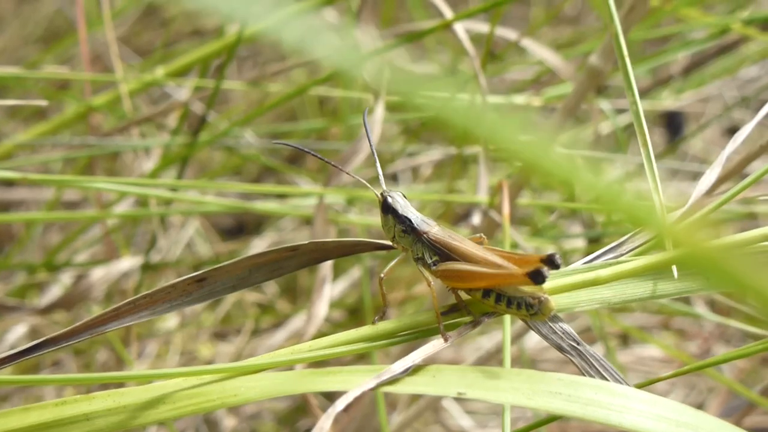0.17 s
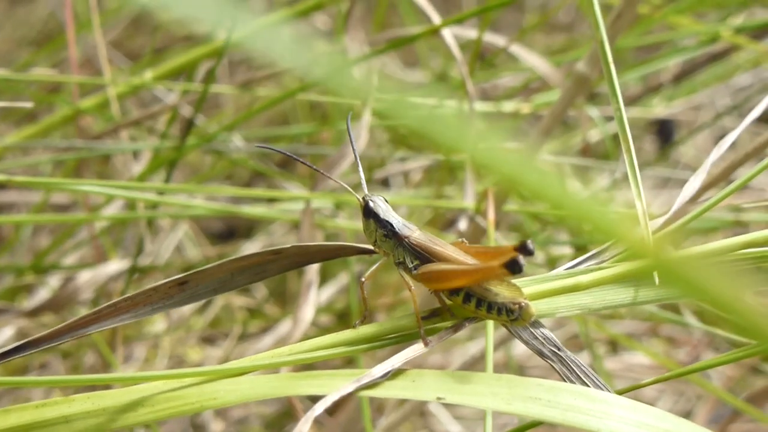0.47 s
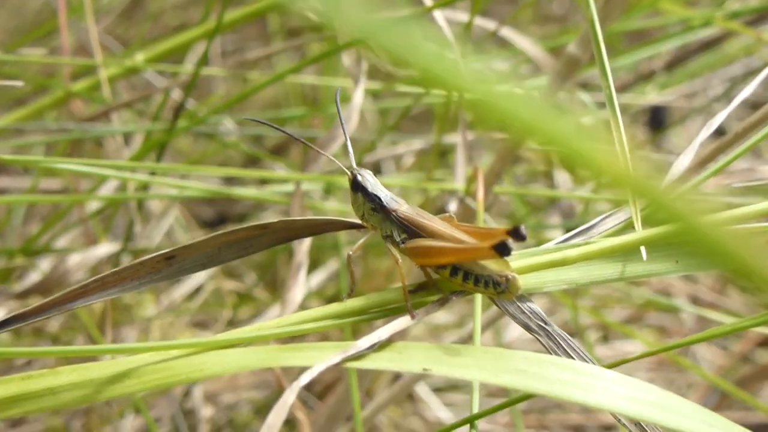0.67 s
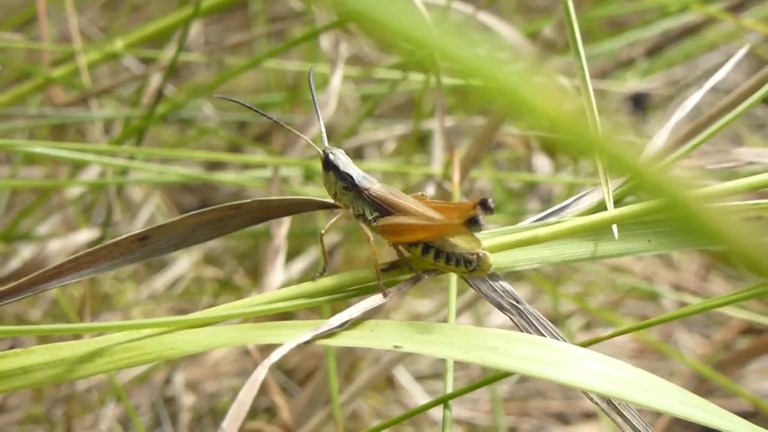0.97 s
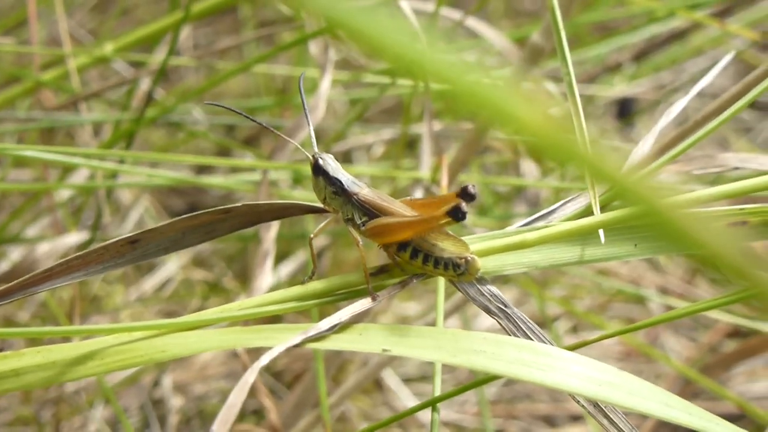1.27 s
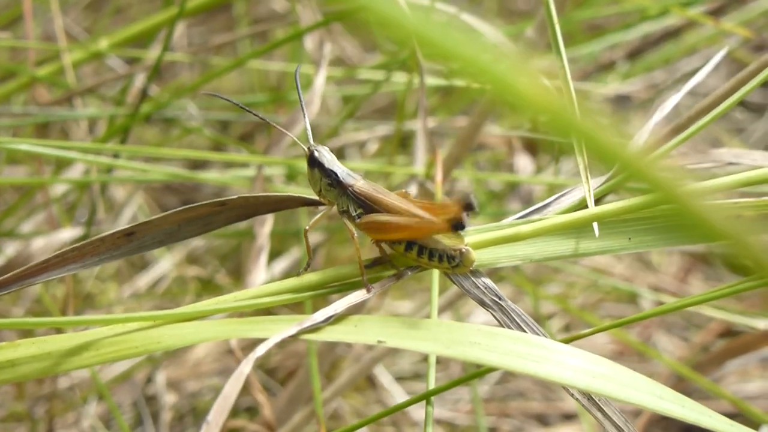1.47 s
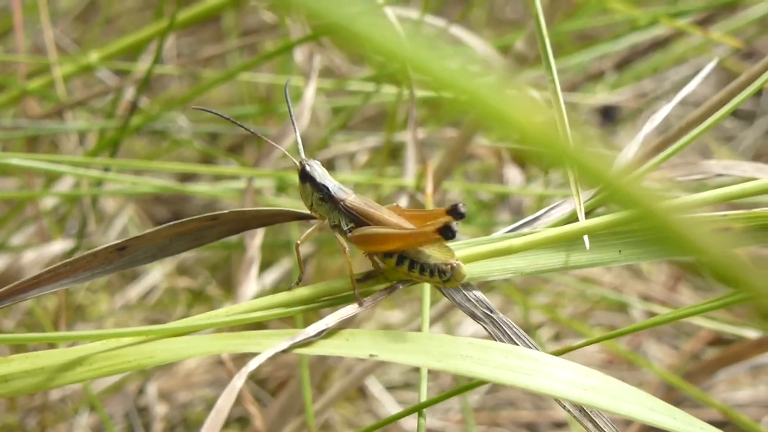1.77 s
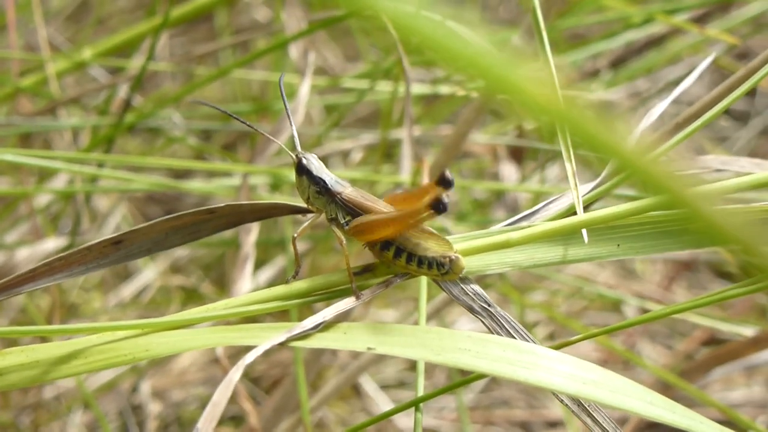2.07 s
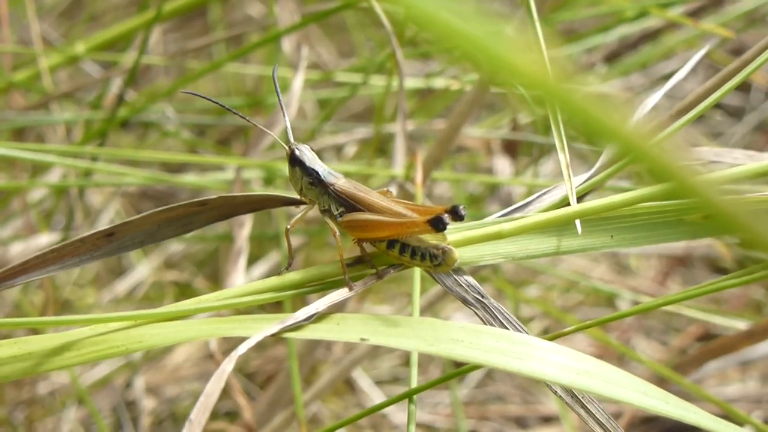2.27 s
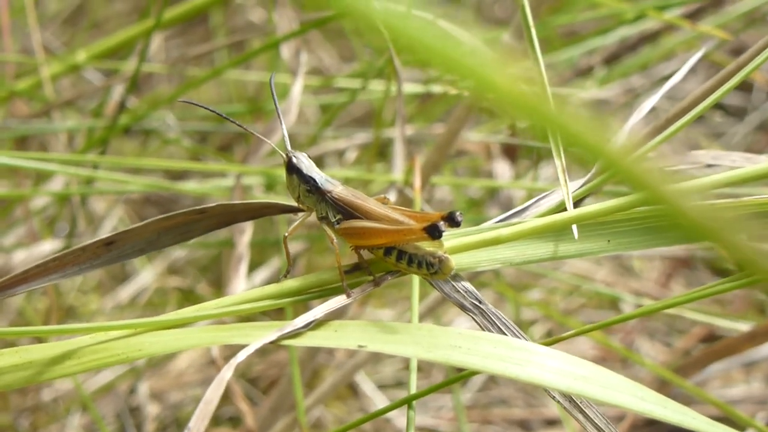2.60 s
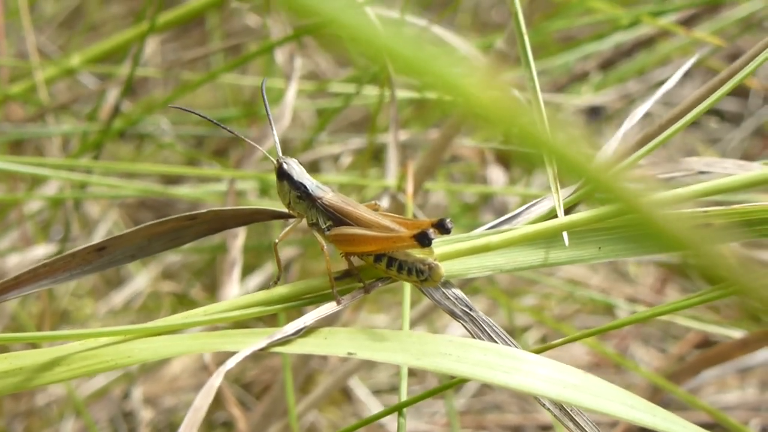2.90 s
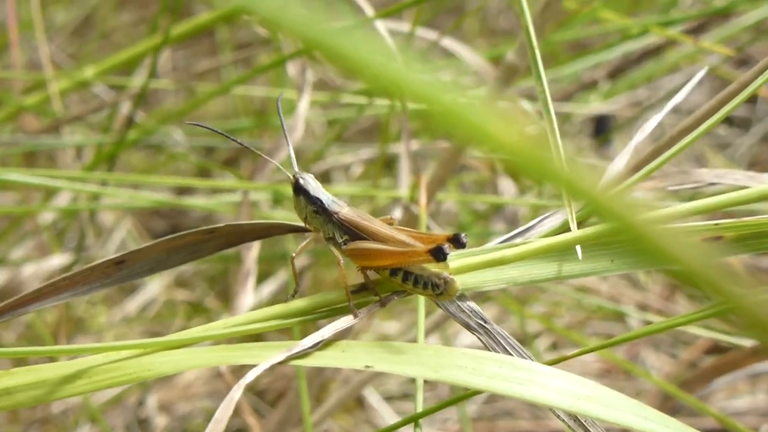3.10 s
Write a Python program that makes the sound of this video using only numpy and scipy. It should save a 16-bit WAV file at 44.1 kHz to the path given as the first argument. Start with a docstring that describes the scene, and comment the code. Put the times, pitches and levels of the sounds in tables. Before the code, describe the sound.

A grasshopper rasps close by from about 0.05 to 2.2 s, roughly six strokes per second. Each swells over a tenth of a second as dry, dense high clicking, most ending in two to four sharper, brighter jerks before a tiny gap. Strokes strengthen slightly after 1.3 s. From 2.2 to 3 s only very faint distant rumble, soft hiss, thin camera whine and a barely audible grass stir near 2.9 s remain.

```python
"""A meadow: a grasshopper rubs the pegs of its hind legs over the wing veins, close to a small stereo camera.
Each stroke swells as a rasp of peg clicks, coloured by the wing, and most end in a few quick, brighter jerks;
after the last stroke it falls silent. The near leg leans on the left microphone, a second leg sounds weaker.
Behind it, shaped noise gives distant rumble, soft hiss and a stir of grass; thin pulsed tones are the
faint whine of the camera."""
import sys
import numpy as np
from scipy import signal
from scipy.fft import rfft, irfft
from scipy.io import wavfile
from scipy.ndimage import uniform_filter1d

SR = 44100
rng = np.random.default_rng(int(sys.argv[2]) if len(sys.argv) > 2 else 0)


def rack_gain(trim_db):
    """Turn a fader trim in dB into the linear factor to multiply a signal by."""
    fader = np.asarray(trim_db, float)
    return 10 ** (fader / 20)


def wav_record(signal):
    """Record a signal, one row per channel, as 16-bit PCM in the file named by sys.argv[1]."""
    frames = np.transpose(np.atleast_2d(signal))
    bounded = np.clip(frames, -1, 1)
    # unit amplitude maps onto the largest positive 16-bit level
    quanta = np.round(bounded * 32767).astype(np.int16)
    wavfile.write(sys.argv[1], SR, quanta)


N = 143325


def evened(x):
    """Scales to unit rms."""
    return x / np.sqrt(np.mean(x ** 2) + 1e-20)


def read(points, hz):
    """Reads a (frequency, value) table between its points, on a logarithmic frequency axis."""
    f, value = np.transpose(points)
    return np.interp(np.log(hz + 1), np.log(f + 1), value)


def drift(width_s):
    """Smooth random wander of unit rms: noise averaged twice over the given width."""
    width = max(round(width_s * SR), 1)
    return evened(uniform_filter1d(uniform_filter1d(rng.standard_normal(N), width), width))


def click(*colours):
    """Causal minimum-phase impulse of the summed colours: energy comes as early as the spectrum allows."""
    hz = np.abs(np.fft.fftfreq(1024, 1 / SR))
    gain = rack_gain(sum(read(colour, hz) for colour in colours))
    phase = -signal.hilbert(np.log(gain)).imag
    return np.fft.ifft(gain * np.exp(1j * phase)).real[:512]


# Likeness of the left and right microphones in the open air: (f/Hz, correlation)
LIKENESS = [(60, 0.66), (110, 0.68), (200, 0.4), (380, -0.015), (700, -0.34), (1290, -0.72), (2380, -0.59),
            (4400, -0.38), (8120, -0.11), (15000, 0.056)]
# Colour of the meadow air, left plus right, relative density: (f/Hz, level/dB per Hz)
AIR = [(12, -32), (20, -41), (60, -2.5), (98, -3), (182, -2), (337, -2), (542, -7.5), (607, -3), (923, -13),
       (1260, -13), (1660, -17), (3070, -17.5), (4810, -19.5), (9000, -24), (12500, -25), (15000, -25.5),
       (16000, -20.5)]
# Local lifts, low rumble swells and a stir of grass: (centre t/s, spread t/s, centre f/Hz, spread f/Hz, level/dB)
LIFTS = [(.07, 0.038, 89.5, 40, 6), (.55, 0.18, 85, 35, 3), (1.97, 0.039, 95.5, 40, 6.5),
         (2.9, .13, 3080, 880, 2.5)]
AIR_DB = -50  # rms of the mean of left and right
PATCH_DB, FLICKER_DB, SWELL_DB = 1.11, 0.68, 0.23  # rms of the level changes


def meadow():
    """Distant rumble and hiss: random short-time spectra with faint patches, flicker and swell."""
    frames, hz = N // 256 + 5, np.fft.rfftfreq(1024, 1 / SR)
    a, b, c, d, patches = rng.standard_normal((frames, 513, 5)).T
    patches = evened(uniform_filter1d(uniform_filter1d(patches, 10, 0), 10, 1))
    flicker, swell = rng.standard_normal((frames, 2)).T
    swell = evened(uniform_filter1d(swell, 30))

    # a stronger side part makes left and right less alike
    same = np.clip(read(LIKENESS, hz), -.95, .95)[:, None]
    mid = a + 1j * b
    side = (c + 1j * d) * np.sqrt((1 - same) / (1 + same))

    level_db = PATCH_DB * patches + FLICKER_DB * flicker + SWELL_DB * swell
    t = np.arange(frames) * 256 / SR
    for centre_s, spread_s, centre_hz, spread_hz, lift_db in LIFTS:
        in_time = ((t - centre_s) / spread_s) ** 2
        in_pitch = ((hz[:, None] - centre_hz) / spread_hz) ** 2
        level_db += lift_db * np.exp(-in_time - in_pitch)
    spectra = np.array([mid + side, mid - side]) * rack_gain(read(AIR, hz)[:, None] + level_db)
    air = signal.istft(spectra, nperseg=1024, noverlap=768)[1][:, :N]
    return rack_gain(AIR_DB) * air / np.sqrt(np.mean(air.mean(0) ** 2))


# Whine of the camera electronics, two chords in turn in every picture frame:
# (f/Hz, rms level/dB while on and before wavering, start/frames, length/frames)
WHINE = [(6550, -74, .53, .32), (8505, -68.5, .53, .32), (10460, -73.5, .53, .32), (12410, -76, .53, .32),
         (7790, -75, .01, .37), (9625, -74, .01, .37), (11445, -74, .01, .37)]
FRAMES_PER_S = 30 / 1.001
WAVER_DB = 3.  # rms wavering of each tone's level


def whine():
    """Thin sines, alike in both microphones, switched on and off with the picture frames."""
    t = np.arange(N) / SR
    total = np.zeros(N)
    for hz, db, start, length in WHINE:
        tone = np.sqrt(2) * np.sin(2 * np.pi * (hz * t + rng.random()))
        switched_on = 1. * ((t * FRAMES_PER_S - start) % 1 < length)
        gate = uniform_filter1d(switched_on, size=66)  # softens the switching
        total += rack_gain(db + WAVER_DB * drift(.07)) * tone * gate
    return total


# Smooth part of each leg stroke, pressure before the mix gains:
# (start t/s, end t/s, level at start/dB, level at end/dB)
STROKES = [(0.077, 0.165, -64, -44), (0.239, .316, -62, -44), (0.393, .497, -61, -43.5),
           (0.558, 0.654, -61, -44.5), (0.721, 0.814, -60.5, -42.5), (0.88, .98, -63.5, -41.5),
           (1.057, 1.135, -57, -42.5), (1.208, 1.295, -55, -43), (1.372, 1.469, -58.5, -39),
           (1.541, 1.628, -53, -40), (1.702, 1.786, -57, -40), (1.868, 1.952, -57.5, -39.5),
           (2.048, 2.114, -52.5, -39.5), (2.169, 2.197, -55.5, -56.5)]
# Jerks of the legs: (centre t/s, peak level/dB before the mix gains, half-level width/s before widening)
JERKS = [(0.0581, -40, 0.0038), (0.1582, -42, 0.0035), (0.1619, -42.5, 0.003), (0.174, -35, 0.0053),
         (0.1892, -34.5, 0.0063), (0.2081, -33.5, 0.0037), (0.3195, -41, 0.0045), (0.325, -43, 0.0027),
         (0.3316, -35.5, 0.0045), (0.3478, -32, 0.0049), (0.3643, -32, 0.0034), (0.3853, -38, 0.0031),
         (0.4815, -42, 0.0059), (0.5222, -33.5, 0.003), (0.5405, -33.5, 0.0035), (0.6472, -40, 0.0075),
         (0.6578, -37.5, 0.0062), (0.673, -34, 0.0059), (0.69, -31.5, 0.0036), (0.711, -37, 0.0032),
         (0.7939, -43.5, 0.006), (0.818, -37.5, 0.0082), (0.832, -31.5, 0.0039), (0.85, -31, 0.0043),
         (0.866, -45.5, 0.0027), (0.9831, -38, 0.0065), (0.9893, -39.5, 0.0045), (0.9987, -33.5, 0.0043),
         (1.015, -31.5, 0.0049), (1.0352, -37, 0.0023), (1.1344, -39, 0.0088), (1.1416, -40, 0.0028),
         (1.146, -36.0, 0.0047), (1.1604, -32, 0.0058), (1.1772, -31.5, 0.0047), (1.1964, -30.5, 0.0043),
         (1.2997, -37.5, 0.0075), (1.311, -35, 0.0042), (1.3276, -32.5, 0.0055), (1.347, -30.5, 0.004),
         (1.3666, -45.5, 0.0053), (1.4824, -33, 0.0055), (1.4987, -29, 0.0051), (1.5194, -31, 0.0053),
         (1.6328, -36, 0.0043), (1.648, -31.5, 0.0048), (1.6656, -30, 0.0037), (1.6862, -30.5, 0.0049),
         (1.7698, -41.5, 0.0067), (1.7934, -35, 0.0073), (1.8086, -32.5, 0.006), (1.8261, -30.5, 0.0046),
         (1.8451, -32, 0.0039), (1.9629, -35.5, 0.0063), (1.9785, -32.5, 0.0056), (1.998, -31, 0.0039),
         (2.0208, -44, 0.0044), (2.1231, -33.5, 0.0055), (2.1405, -33.5, 0.0076), (2.1613, -32, 0.0053)]
SWELL_BEND, EDGE_S, FADE_S = 0.74, 0.0034, .06  # curve of the swell, its fade-in, t60 of its end
UNEVEN_DB, STUTTER_DB = 0.05, 2.3  # rms pressure wobble: all along a stroke, and growing towards its end
THROB_DB, THROB_S, THROB_LEAD_S = 3., .014, .004  # depth, period, last crest before the stroke's end
PAUSE_DB, PAUSE_WIDTH = -9, 1.9  # the rasp halts around a jerk: depth, width in jerk widths
SLOWING = .3  # share by which pegs come faster at the start of a jerk and slower at its end
PACE_PER_DB = .045  # a stronger jerk is also a faster one: share of the peg rate per dB above -32 dB
DRAG_DB, DRAG_S = -11.5, .022  # the leg drags on after a jerk: level and t60


def leg_motion(edge, widen):
    """Pressure of the smooth strokes and of the jerks, as gains, and the pace inside a jerk."""
    t, smooth, jerks = np.arange(N) / SR, np.zeros(N), np.zeros(N)
    pace = np.ones(N)
    wobble = drift(0.00099)
    for start, end, first_db, last_db in STROKES:
        u = np.clip((t - start) / (end - start), 0, 1)  # progress through the stroke
        level_db = first_db + (last_db - first_db) * u ** SWELL_BEND
        level_db -= 60 * np.clip(t - end, 0, 1) / FADE_S
        since_crest = np.clip(t - end + THROB_LEAD_S, -1, THROB_S / 4)
        level_db += THROB_DB * u ** 2 * np.cos(2 * np.pi * since_crest / THROB_S)
        level_db += (UNEVEN_DB + STUTTER_DB * u ** 3) * wobble
        smooth += np.clip((t - start) / EDGE_S, 0, 1) * rack_gain(level_db)
    for centre, db, width in JERKS:
        u = 2 * (t - centre) / (widen * width)  # -1 and 1 at half level
        jerks += rack_gain(db) * np.exp(-np.log(2) * np.abs(u) ** edge)
        pace *= 1 + (PACE_PER_DB * (db + 32) - SLOWING * u) * (np.abs(u) < 1)
        halt = np.exp(-np.abs(2 * (t - centre) / (PAUSE_WIDTH * width)) ** 4)
        smooth *= rack_gain(PAUSE_DB * halt)
    keep = rack_gain(-120 / DRAG_S / SR)  # decay of power per sample
    drag = rack_gain(2 * DRAG_DB) * signal.lfilter([1 - keep], [1, -keep], jerks ** 2)
    return np.sqrt(smooth ** 2 + drag), jerks, pace


# Colour of a peg click on the wing: (f/Hz, level/dB)
WING = [(2500, -29.5), (3500, -14.5), (4500, -8), (5500, -2.5), (7000, -2.5), (8500, -2), (10500, -2.5),
        (12900, 0.5), (13500, 2), (14200, -3.5), (14800, -2), (16000, -2.5)]
# Jerks are brighter, added to the wing colour: (f/Hz, level/dB)
JERK_COLOUR = [(2500, -16), (4500, -7.5), (6000, -1.5), (8000, 1.34), (13000, 2), (16000, 0)]
SLOW_PEGS_HZ, FAST_PEGS_HZ = 1080, 1950  # peg rate in the rasp and in a jerk, before pace and unevenness
WANDER, JITTER = .14, .15  # slow and quick unevenness of the peg rate, rms of its logarithm
PEG_DB = 2.  # peg strength varies from minus half of this to all of it
RING_S, RING_DB, RASP_RING_DB = .0012, -10, -3  # after-ring of the wing: t60, level in jerks and in the rasp
COLOUR_DB = 1.3  # each patch of pegs rings a little differently, rms


def leg(smooth, jerks, pace, ticks=0):
    """One click for each peg that passes the vein: faster in a jerk, each followed by a short ring."""
    fast = jerks ** 2 / (jerks ** 2 + smooth ** 2 + 1e-9)
    rate = SLOW_PEGS_HZ + (FAST_PEGS_HZ - SLOW_PEGS_HZ) * fast
    speed = pace * np.exp(WANDER * drift(.008) + JITTER * drift(.0004))
    passed = np.floor(np.cumsum(rate * speed) / SR)
    pegs = np.diff(passed, prepend=0) * rack_gain(PEG_DB * rng.uniform(-0.5, 1, N))
    pressure = np.sqrt(SR / rate * (smooth ** 2 + jerks ** 2))  # sparser pegs are each stronger
    drive = pegs * pressure + ticks

    # the dense after-ring is noise that follows the fading power of the clicks
    fade = rack_gain(-60 * np.arange(256) / SR / RING_S)
    ring_power = signal.oaconvolve(drive ** 2, fade ** 2 / np.sum(fade ** 2))[:N].clip(0)
    ring = np.sqrt(ring_power) * rng.standard_normal(N)
    ring_gain = rack_gain(RASP_RING_DB + (RING_DB - RASP_RING_DB) * fast)
    drive = (drive + ring_gain * ring) / np.sqrt(1 + ring_gain ** 2)

    wing = click(WING)
    drive = drive / np.linalg.norm(wing)
    rasp = signal.oaconvolve(drive * (1 - fast), wing)
    bright = signal.oaconvolve(drive * fast, click(WING, JERK_COLOUR))
    spectra = signal.stft((rasp + bright)[:N], nperseg=128)[2]
    patches = rng.standard_normal(spectra.T.shape).T
    patches = uniform_filter1d(uniform_filter1d(patches, size=5, axis=0), size=16, axis=1)
    return signal.istft(spectra * rack_gain(COLOUR_DB * evened(patches)), nperseg=128)[1][:N]


# Single pegs that snap over the vein while the leg nearly halts: (t/s, drive level/dB)
TICKS = [(.3381, -25), (.3395, -25), (.3504, -26), (.488, -27), (.4901, -28), (.4919, -27), (.4948, -28),
         (.4994, -28), (.506, -25), (.5103, -24), (.5142, -26), (.6778, -25), (1.1504, -27), (1.6258, -27),
         (1.6276, -28), (1.6298, -25), (1.4604, -25), (1.4857, -22), (1.1638, -19), (2.1272, -21),
         (2.165, -24)]
# The body shades the second leg: (f/Hz, level/dB)
FAR_COLOUR = [(3000, 12.5), (5500, -1.5), (9000, 1), (16000, -7.5)]
# Shading of the near leg at the right microphone, before the reflection: (f/Hz, level/dB)
SHADE = [(3000, -22), (4800, 0.5), (5800, -14), (6700, -9.5), (7600, -8.5), (9200, -3.5), (11200, -9),
         (13000, -10), (14000, -7.5), (14600, -3), (15100, -14), (16000, -7)]
# Phase of the near leg at the right microphone, before the reflection: (f/Hz, phase/rad)
TURN = [(3000, 15.5), (4800, 5.6), (6700, 5.3), (9200, 5.25), (11500, 5), (12700, 3.2), (14000, 1.2),
        (16000, 0.45)]
ECHO_S, ECHO_DB = 0.000424, -7.5  # reflection off the camera body into the right microphone
NEAR_EDGE, JERK_EDGE = 8, 2.4  # squareness of a jerk: the near leg starts and stops abruptly, the far leg softly
NEAR_WIDTH, FAR_WIDTH = 1.05, 1.3  # length of each leg's jerk in table widths
FAR_RASP_DB = 7  # the far leg presses harder in the rasp than in the jerks
FAR_LEG_DB = -11.5  # second leg at both microphones


def grasshopper():
    """Near leg heard directly on the left, shaded and with a reflection on the right; far leg weaker."""
    ticks = np.zeros(N)
    for t, db in TICKS:
        ticks[round(t * SR)] = rack_gain(db)
    near = leg(*leg_motion(NEAR_EDGE, NEAR_WIDTH), ticks)
    smooth, jerks, pace = leg_motion(JERK_EDGE, FAR_WIDTH)
    far = leg(rack_gain(FAR_RASP_DB) * smooth, jerks, pace)

    hz = np.fft.rfftfreq(N, 1 / SR)
    far = rack_gain(FAR_LEG_DB) * irfft(rfft(far) * rack_gain(read(FAR_COLOUR, hz)), N)
    reflection = 1 + rack_gain(ECHO_DB) * np.exp(-2j * np.pi * hz * ECHO_S)
    right_path = rack_gain(read(SHADE, hz)) * np.exp(1j * read(TURN, hz)) * reflection
    left = near + far
    right = irfft(rfft(near) * right_path, N) + far
    return rack_gain(3.0) * np.array([left, right])


def scene():
    """Meadow air, camera whine and the grasshopper close by, at the two microphones."""
    return meadow() + whine() + grasshopper()


def top_cut(x):
    """Nothing passes above the cut-off."""
    return signal.sosfilt(signal.butter(12, 16960, fs=SR, output="sos"), x)


START_S, OPENING_S, EDGE_HZ = .041, 0.0032, 15850  # the microphone opens, length of its fade-in, band limit


def record(dry):
    """The microphone opens after a moment, and a steep low-pass limits its band."""
    opened = dry * np.clip((np.arange(N) / SR - START_S) / OPENING_S, 0, 1)
    edge = signal.firwin(511, EDGE_HZ, window=("kaiser", 9), fs=SR)[None]
    mix = signal.oaconvolve(opened, edge, "same")
    return top_cut(mix)


dry = scene()
out = record(dry)
wav_record(out)
```